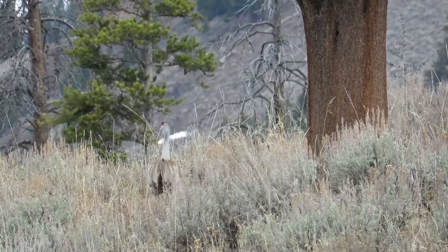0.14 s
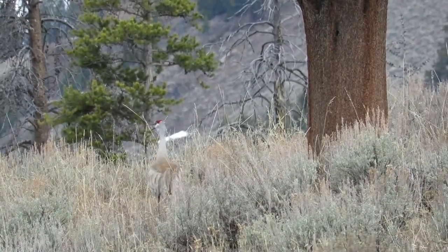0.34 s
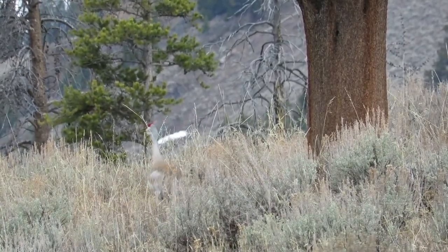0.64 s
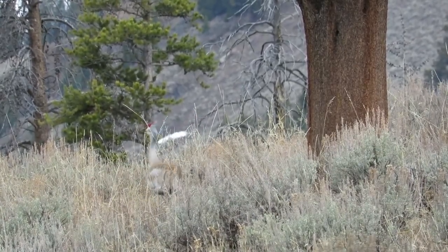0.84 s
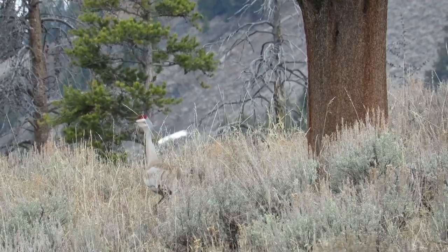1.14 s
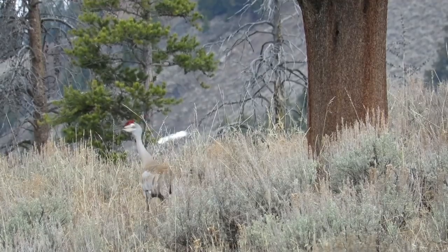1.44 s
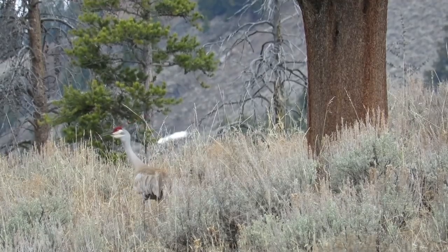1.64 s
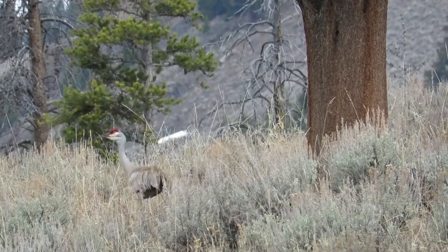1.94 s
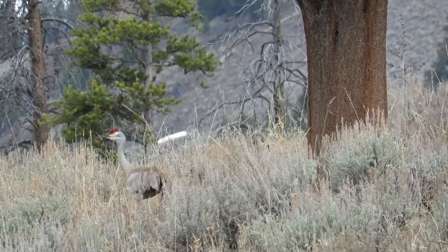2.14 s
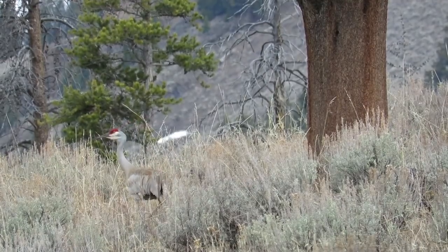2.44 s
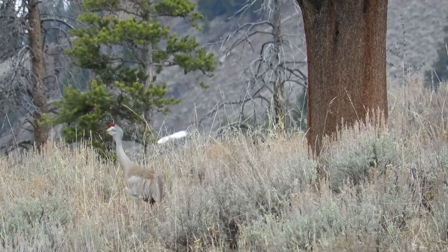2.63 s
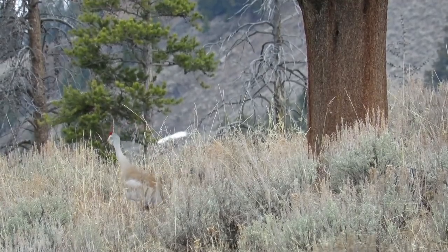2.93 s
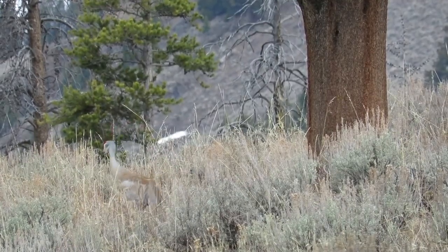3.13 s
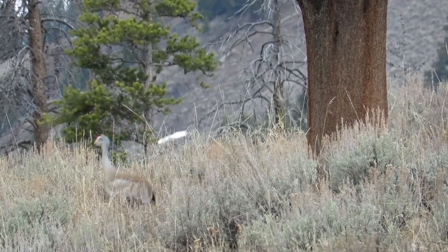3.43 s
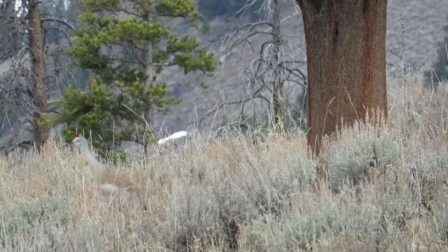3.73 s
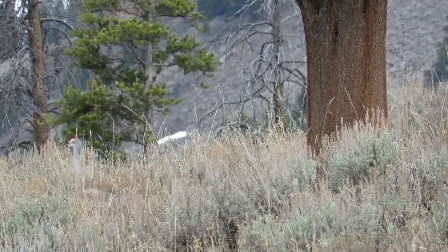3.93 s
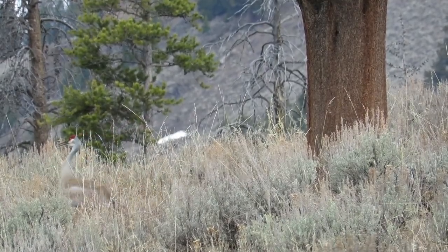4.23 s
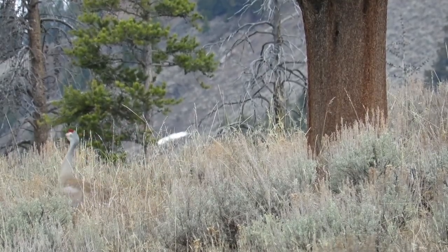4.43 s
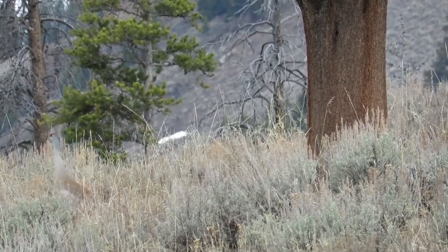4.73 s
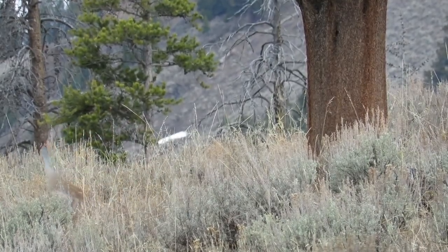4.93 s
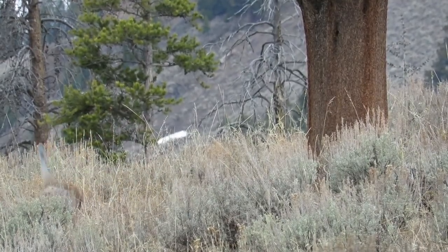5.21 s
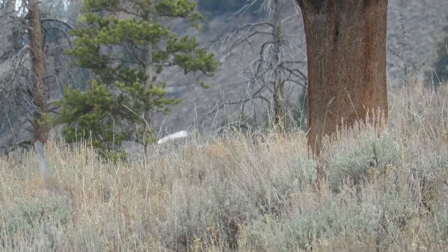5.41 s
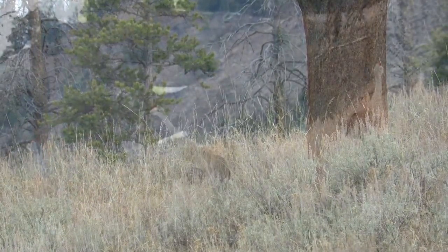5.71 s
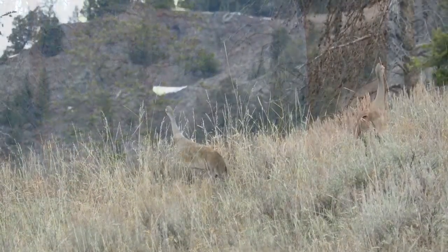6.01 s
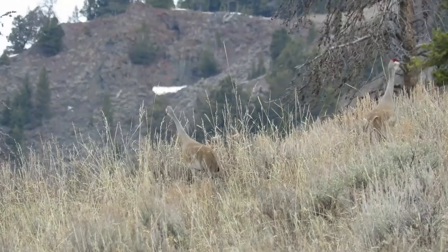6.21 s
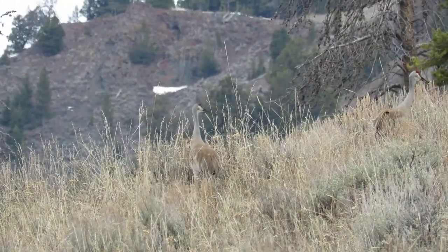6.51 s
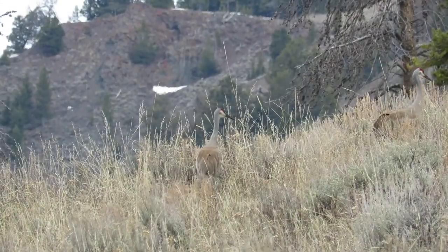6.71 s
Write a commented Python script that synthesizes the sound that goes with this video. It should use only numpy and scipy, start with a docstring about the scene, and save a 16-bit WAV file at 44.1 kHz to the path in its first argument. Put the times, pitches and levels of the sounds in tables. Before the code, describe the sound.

Loud crane duet in open grassland with trees, lasting about 6.9 seconds. It opens in the middle of a low bird's rattling roll; a short honk and a higher answering roll follow at 0.2, then another low roll near 0.6. After a brief gap, honks and overlapping high and low rolls come at 1.2-1.7. Thin gliding songbird whistles show around 0.9-1.1 and 1.7-2.15, with little ticks at 0.8 and 2.6. The pair resumes at 2.9-3.5, again at 3.8-4.4, and at 4.7-5.4, each roll five to nine ringing trumpet bursts that quicken, with rough echoes and a diffuse tonal murmur. Dry grass crackles close by from 4.6 to 5.8, with small knocks and ticks continuing to 6.2. A low call at 5.6 is weaker; fainter, drier rolls follow at 5.9 and 6.6. Soft air and low wind puffs run throughout, quieter at the end.

```python
"""Two cranes call in duet on an open slope: short honks and mostly quickening rolls of trumpet bursts.
A burst is a ringing windpipe, its upper resonances and a breath; a honk is ten harmonics and a rasp.
Sparse decaying echoes scatter both among trees, over a diffuse murmur of brief overlapping harmonic tones.
Filtered noise makes the open air, wind puffs, grass rustle and close ticks, beside decaying sine knocks;
a small songbird whistles in gliding sines."""
import sys
import numpy as np
from scipy import signal
from scipy.fft import rfft, irfft
from scipy.io import wavfile
from scipy.ndimage import uniform_filter1d

SR = 44100
rng = np.random.default_rng(int(sys.argv[2]) if len(sys.argv) > 2 else 0)


def dump_mix(stems):
    """Bounce the given channels to the path in sys.argv[1] as a 16-bit WAV at rate SR."""
    frames = np.atleast_2d(stems).T  # one column per channel
    limited = np.clip(frames, -1, 1)  # hard clip at full scale
    pcm = np.round(limited * 32767).astype(np.int16)
    wavfile.write(sys.argv[1], SR, pcm)


N = 302526

# colour of the breath through the beak: f/Hz, level/dB
BEAK = [(500, -54), (1100, 8), (2000, 2), (3300, -6.5), (4600, -9), (6000, -13.5), (10000, -26),
        (15000, -59)]


def gain_of(db):
    """Level and amplitude: 20 dB is a factor of ten."""
    return 10 ** (np.asarray(db) / 20)


def evened(x):
    """Normalisation: scales a signal to rms 1."""
    return x / np.sqrt(np.mean(x ** 2) + 1e-20)


def read(points, hz):
    """Spectral envelope: interpolates a table on a log-frequency axis."""
    f, value = np.transpose(points)
    return np.interp(np.log(hz + 1), np.log(f + 1), value)


def curve(rows):
    """Level contour: interpolates the second column of a table at every sample."""
    t, value = np.transpose(rows)
    return np.interp(np.arange(N) / SR, t, value)


def add(mix, s, sound):
    """Superposition: adds a sound from time s, cut at both ends of the mix."""
    at = round(s * SR)
    part = mix[max(at, 0):][:max(len(sound) + min(at, 0), 0)]
    part += sound[max(-at, 0):][:len(part)]


def noise(points, patchy_db):
    """Filtered noise: random short-time spectra, shaped in frequency, with drifting patches."""
    hz = np.fft.rfftfreq(1024, 1 / SR)
    real, imaginary, patches = rng.standard_normal((N // 256 + 5, 513, 3)).T
    patches = evened(uniform_filter1d(uniform_filter1d(patches, 10, 0), 10, 1))
    level_db = read(points, hz)[:, None] + patchy_db * patches
    spectra = (real + 1j * imaginary) * gain_of(level_db)
    return signal.istft(spectra, nperseg=1024, noverlap=768)[1][:N]


def waver(size, smooth):
    """Random modulation: twice-smoothed noise of rms 1, smooth in samples."""
    return evened(uniform_filter1d(uniform_filter1d(rng.standard_normal(size), smooth), smooth))


def breath(size, colour):
    """Turbulence: air rushing past the membranes, its spectrum coloured by beak or throat."""
    spectrum = rfft(rng.standard_normal(size))
    return evened(irfft(spectrum * gain_of(read(colour, np.fft.rfftfreq(size, 1 / SR))), size))


def swell(t, rise, fall):
    """Amplitude envelope: a squared-sine opening, then a Gaussian close."""
    return np.sin(np.pi / 2 * np.clip(t / rise, 0, 1)) ** 2 * np.exp(-(np.maximum(t - rise, 0) / fall) ** 2)


def scatter(x, stretch, width):
    """Multiple scattering: sparse echoes of random sign from trunks and slopes, with a t60 set by frequency."""
    # decay among the trees: f/Hz, t60/s (before the stretch)
    decay = [(500, 0.86), (1000, 0.13), (3000, 0.41), (8000, 0.088)]
    size = int(stretch * SR / 2)
    taps = np.zeros((2, size))
    at = np.arange(200, size - 20, 20) + rng.integers(0, 20, (2, (size - 201) // 20))
    np.put_along_axis(taps, at, rng.choice([-1., 1.], at.shape), 1)
    hz, t, spectra = signal.stft(taps, SR, nperseg=256)
    t60 = stretch * read(decay, hz)[:, None]
    tail = signal.istft(spectra * gain_of(-60 * t / t60), SR, nperseg=256)[1]
    tail = tail / np.linalg.norm(tail[0])
    mid, side = signal.fftconvolve(x[None], tail, axes=1)[:, :N]
    return np.array([mid + width * side, mid - width * side])  # width: share opposed between the ports


def air():
    """Stereo decorrelation: broad air noise whose low part is mostly opposed between the ports."""
    # level of the shared part: t/s, level/dB
    levels = [(0, -43), (.65, -44), (5.04, -44.5), (5.29, -41.5), (5.52, -45), (5.83, -51), (6.86, -52)]
    # relative spectrum of what both ports share: f/Hz, density/dB per Hz
    shared = [(25, -46), (45, -48), (80, -5), (300, -3), (600, 3), (1000, 1), (1150, -2), (2400, -11.5),
              (4900, -19.5), (11800, -33), (13800, -38), (15300, -60)]
    # relative spectrum of what they hear opposed: f/Hz, density/dB per Hz
    opposed = [(30, -45), (73, -21), (114, -2.5), (242, 8), (430, 8), (520, 3), (1430, -6.5), (3560, -17),
               (11500, -30), (13800, -38), (15300, -60)]
    mid, side = noise(shared, patchy_db=2.3), noise(opposed, patchy_db=0.5)
    return np.array([mid + side, mid - side]) / np.std(mid) * gain_of(curve(levels))


def wind():
    """Wind turbulence on the microphone: low band noise, each puff rising and falling at a steady dB rate."""
    # puffs: t of the peak/s, peak level/dB, middle f/Hz
    puffs = [(0.609, -55, 110), (1.362, -59, 109), (3.192, -58, 110), (4.03, -52, 60), (4.198, -56, 61.6),
             (5.579, -53, 69), (5.827, -49.5, 44.7), (6.269, -63, 50), (6.589, -57, 50.3)]
    rise_db_per_s, fall_db_per_s = 113, 137
    out, t = np.zeros((2, N)), np.arange(-SR // 2, SR // 2) / SR
    shape = gain_of(np.minimum(rise_db_per_s * t, -fall_db_per_s * t))
    for s, db, hz in puffs:
        band = signal.butter(2, [0.63 * hz, 1.68 * hz], "band", fs=SR, output="sos")
        mid, side = evened(signal.sosfilt(band, rng.standard_normal((2, SR))))
        for port, sign in zip(out, (1, -1)):
            add(port, s + t[0], gain_of(db) * shape * (mid + 0.54 * sign * side))
    return out


def murmur():
    """Diffuse superposition: brief overlapping harmonic tones at random times in two pitch groups, smeared."""
    # level of the whole murmur: t/s, level/dB
    levels = [(0, -32), (.15, -38), (1.16, -37), (1.45, -29), (1.75, -40.5), (1.97, -39), (2.44, -35.5),
              (2.95, -43), (3.3, -35), (3.7, -40.5), (4.0, -33.5), (4.6, -37.5), (5.15, -34), (5.35, -35.5),
              (6.25, -53.5), (6.86, -47)]
    # relative level of each partial from the first up: level/dB
    partials = [8, -10, -35, -24.5, -32]
    centre_hz, tones_per_s = 819.7, 70  # midway between the two pitch groups
    tones, t = np.zeros(N), np.arange(900) / SR
    for when, spread, size, long, group in rng.random((600, 5))[:int(tones_per_s * N / SR)]:
        hz = centre_hz * (1 + 0.074 * np.sign(group - .5) + 0.029 * (long - .5))
        tone = 0
        for k, db in enumerate(partials, 1):
            detuned = k * hz * (1 + 0.2 * (spread - .5) / k ** 3)
            tone = tone + gain_of(db) * np.sin(2 * np.pi * detuned * t)
        hump = np.sin(np.pi * np.clip(t / (.011 + 0.0066 * long), 0, 1)) ** 2
        add(tones, when * N / SR, gain_of(5.3 * size) * tone * hump)
    diffuse = 0.69 * tones + scatter(tones, 2.7, width=0.33)
    running_rms = np.sqrt(uniform_filter1d(diffuse.mean(0) ** 2, 9000))
    return diffuse / running_rms * gain_of(curve(levels))


def grass():
    """Friction noise: dry stalks rub and crackle for about a second and a half, independently at each port."""
    # rustle, before the fades at either end: t/s, level/dB
    levels = [(4.4, -56), (4.72, -50.5), (4.78, -48.5), (4.9, -44), (5.0, -47.5), (5.15, -55), (5.3, -50.5),
              (5.45, -47), (5.6, -45.5), (5.87, -54)]
    # relative spectrum: f/Hz, density/dB per Hz
    colour = [(120, -21), (270, 13), (500, -10), (1500, 2.5), (5000, -11), (8000, -10), (12000, -14),
              (13200, -15), (15000, -53)]
    t = np.arange(N) / SR
    fade_in = np.clip((t - levels[0][0]) / 0.26, 0, 1)
    fade_out = np.clip((levels[-1][0] - t) / 0.63, 0, 1)
    crackle = gain_of(0.63 * waver(N, 60))
    rub = np.array([evened(noise(colour, patchy_db=-2.0)) for _ in range(2)])
    return rub * crackle * fade_in * fade_out * gain_of(curve(levels))


def ticks():
    """Impulsive sources near the microphone: decaying noise for treble ticks, decaying sines for dull knocks."""
    # ticks: t/s, peak level/dB, lowest f/Hz
    snaps = [(.758, -34, 3430), (2.62, -36, 4500), (2.662, -33, 3500), (4.648, -37, 4000),
             (4.723, -37, 3500), (5.607, -49, 7100), (5.713, -46, 4440), (5.794, -45, 4020),
             (5.888, -38, 2200), (6.122, -38.5, 1600)]
    # knocks: t/s, amplitude before attack and decay/dB, f/Hz
    knocks = [(4.888, -31, 420), (5.171, -16, 1230), (5.428, -23, 530), (5.594, -32, 330),
              (5.688, -31, 328), (6.123, -35, 297), (6.179, -35, 330)]
    out, t = np.zeros(N), np.arange(1200) / SR
    for s, db, hz in snaps:
        snap = rng.standard_normal(len(t)) * (np.exp(-t / 0.0006) + 0.12 * np.exp(-t / 0.013))
        snap = signal.sosfilt(signal.butter(2, [hz, 13500], "band", fs=SR, output="sos"), snap)
        add(out, s, gain_of(db) * snap / abs(snap).max())
    for s, db, hz in knocks:
        envelope = np.minimum(t / 0.00042, 1) * np.exp(-t / 0.0016)
        add(out, s, gain_of(db) * np.sin(2 * np.pi * hz * t) * envelope)
    return out


def songbird():
    """Frequency glides: short whistled sines with a fluttering level, scattered among the trees."""
    # notes: t/s, length/s, first f/Hz, last f/Hz, level before flutter and fades/dB
    notes = [(0.872, 0.048, 2465, 2520, -59), (0.995, 0.025, 3810, 3850, -55.5),
             (1.005, 0.014, 3150, 3100, -59), (1.063, 0.031, 2220, 2600, -55),
             (1.113, .014, 3140, 3100, -62), (1.703, 0.028, 2830, 2690, -55),
             (1.726, 0.02, 2640, 3480, -53), (1.736, 0.036, 3530, 2960, -50.5),
             (1.822, .016, 3600, 3800, -62), (1.85, .015, 4750, 4950, -57), (1.868, .03, 3550, 2880, -55.5),
             (1.905, .02, 4050, 4120, -61), (1.948, .012, 4700, 4900, -60), (2.005, 0.03, 3440, 3530, -58),
             (2.053, .035, 3900, 3650, -61), (2.09, 0.034, 3530, 2720, -52.5),
             (2.131, .03, 4700, 4900, -61)]
    out = np.zeros(N)
    for s, length, hz, last_hz, db in notes:
        size = round(length * SR)
        tone = np.sin(2 * np.pi * np.cumsum(np.linspace(hz, last_hz, size)) / SR)
        flutter = 1.1 + 0.28 * waver(size, 40)
        add(out, s, np.sqrt(2) * gain_of(db) * tone * signal.windows.tukey(size, .5) * flutter)
    return out + gain_of(-8.0) * scatter(out, 0.068, width=1.0)


def honk(s, length, hz, last_hz, tone_db, tilt_db, throat_hz, bright_db, rasp_db):
    """Source and filter: a hoarse note of ten wavering harmonics, lifted near the throat resonance."""
    # relative level of the lowest four partials: f/Hz, level/dB
    low_colour = [(510, 1), (590, -2), (680, -0.5), (1030, -2), (1160, 3), (1350, 2), (1700, -2),
                  (2000, -4.5), (2700, -13)]
    # relative level of partials five to ten: f/Hz, level/dB
    bright_colour = [(2500, 3), (2850, 7), (3300, 2), (4400, -0.5), (6000, -16), (8000, -28)]
    # throat's colour of the rasp: f/Hz, level/dB
    throat = [(400, -29), (650, 4), (1000, -4), (1500, -8), (2800, -15), (4500, -25), (8000, -51)]
    throat_lift_db, throat_width_hz = 5, 380
    arch_share = 0.045  # share by which the pitch arches up to the middle
    size = 2 * int(length * SR)
    t = np.arange(size) / SR / length  # in lengths of the honk
    arch = arch_share * (np.sin(np.pi * np.minimum(t / 1.147, 1)) - .75)
    glide = np.interp(t, [.1, 1.1], [hz, last_hz])
    cycles = np.cumsum(glide * (1 + arch + .012 * waver(size, 200))) / SR
    low, high = 0, 0
    for k in range(1, 11):
        line = (1 + (.38 + .04 * k) * waver(size, 70)) * np.sin(2 * np.pi * (k * cycles + rng.random()))
        if k <= 4:
            lift_db = throat_lift_db * np.exp(-((k * hz - throat_hz) / throat_width_hz) ** 2)
            low = low + gain_of(tone_db + tilt_db * (k - 1) + read(low_colour, k * hz) + lift_db) * line
        else:
            high = high + gain_of(read(bright_colour, k * hz)) * line
    high = evened(high) + .4 * breath(size, BEAK)
    rasp = breath(size, throat) * (1 + 0.18 * np.cos(2 * np.pi * cycles))  # puffs once a cycle
    body = (low + gain_of(rasp_db) * rasp) * swell(t, 0.4, 0.85)
    bright = gain_of(bright_db) * high * swell(t, 0.49, 0.77)  # opens later, then falls faster
    end_fade = np.clip((1.25 - t) / 0.46, 0, 1)  # a short fade to silence
    return s - .1 * length, end_fade * (body + bright)


LOW_VOICE_BELOW_HZ = 830  # parts the two birds by voice pitch
RING_RISE, RING_FALL = .42, .6  # shares of a burst's length


def burst(s, hz, ring_hz, ring_db, second_db, bright_db, tilt_db, ms):
    """Resonance: membranes slam open, the windpipe rings low; upper resonances and breath last longer."""
    # upper resonances of the low bird's coiled windpipe: f/Hz, width/Hz, relative level/dB
    low_pipe = [(1730, 150, -6), (2385, 110, 0), (2820, 120, -5), (3140, 200, -2), (3945, 220, -2),
                (4420, 150, -12), (4780, 220, -8), (5500, 250, -15), (6300, 300, -23)]
    # upper resonances of the high bird's: f/Hz, width/Hz, relative level/dB
    high_pipe = [(2030, 120, -7), (2745, 90, 0), (3320, 130, -6), (3570, 170, -1), (4570, 220, -4),
                 (5440, 180, -12), (6500, 300, -24)]
    ring_glide_per_s, voice_glide_per_s = 5, 1.1  # shares of the pitch lost per second within a burst
    t, length = np.arange(2000) / SR, ms / 1000
    ring_cycles = ring_hz * t * (1 + ring_glide_per_s * (.5 * length - t / 2))
    ring = gain_of(ring_db) * np.sin(2 * np.pi * (ring_cycles + rng.random()))
    ring = ring * swell(t, RING_RISE * length, RING_FALL * length)
    glide = voice_glide_per_s * np.maximum(.5 * length - t, -length)
    cycles = np.cumsum(hz * (1 + 0.011 * waver(len(t), 120) + glide)) / SR
    second = np.sin(2 * np.pi * (2 * cycles + rng.random())) * (1 + .55 * waver(len(t), 60))
    second = gain_of(second_db) * second * swell(t, .4 * length, .85 * length)
    # each line's level and frequency vary at random from burst to burst; random modulation roughens it
    pipe = 0
    for f, width, db in (low_pipe if hz < LOW_VOICE_BELOW_HZ else high_pipe):
        gain = gain_of(db + tilt_db * f / 1000 + 2.2 * rng.standard_normal())
        roughness = .5 + .6 * waver(len(t), int(.25 * SR / width))
        varied_hz = f + .25 * width * rng.standard_normal()
        pipe = pipe + gain * roughness * np.sin(2 * np.pi * (varied_hz * t + rng.random()))
    pipe = evened(pipe) * swell(t, 0.002 + 0.25 * length, 0.006 + 0.45 * length)
    rush = .62 * breath(len(t), BEAK) * swell(t, .003 + .3 * length, .008 + .7 * length)
    return s - RING_RISE * length, ring + second + gain_of(bright_db) * (pipe + rush)


LOW_MS, HIGH_MS = 14, 9.5  # length of a direct burst for each bird
ECHO_SPREAD_MS, ECHO_STRETCH = 2.5, 1.45  # scatter of the delay; rough bark draws the echo out
RING_SPREAD, RING_SAG, PITCH_SPREAD = 0.018, 0.025, .01  # shares of pitch: chance, sag along a roll, chance
UNEVEN_DB, TOP_FADE = .8, 2.2  # chance from beat to beat; fade of the upper partials, times the ring's
FIRST_TOP_DB = 0.5  # the first direct burst has stronger upper partials


def roll(start, beats, first_ms, settled_ms, settle, hz, ring_hz, ring_db, second_db, bright_db, tilt_db,
         fade_db, echo_ms, echo_db, echo_top_db):
    """Geometric settling and reflection: gaps approach a limit, each beat thrown back once by a near trunk."""
    k = np.arange(round(beats))
    gaps_ms = settled_ms + (first_ms - settled_ms) * settle ** k[:-1]
    times = start + np.cumsum(np.r_[0, gaps_ms]) / 1000
    ms = LOW_MS if hz < LOW_VOICE_BELOW_HZ else HIGH_MS
    for s, done in zip(times, k / k[-1]):
        fade = fade_db * done ** 7.6  # falls mainly at the end of the roll
        direct = (0, 0, 0)
        echo = (echo_ms + ECHO_SPREAD_MS * rng.standard_normal(), echo_db, echo_top_db)
        for late_ms, low_db, top_db in (direct, echo):
            a, b, c, d, e = rng.standard_normal(5)
            top_db += TOP_FADE * fade + (FIRST_TOP_DB if s == start and not late_ms else 0)
            yield (s + late_ms / 1000,
                   hz * (1 + PITCH_SPREAD * a),
                   ring_hz * (1 - RING_SAG * done + RING_SPREAD * b),
                   ring_db + low_db + fade + UNEVEN_DB * c,
                   second_db + top_db + UNEVEN_DB * d,
                   bright_db + top_db + UNEVEN_DB * e,
                   tilt_db,
                   ms * ECHO_STRETCH if late_ms else ms)


def cranes():
    """Direct sound plus reverberation: the near pair, straight ahead, with the trees ringing after them."""
    # honks: t/s, length/s, first and last f before the arch/Hz, tone level/dB, tilt/dB per partial,
    # throat resonance f/Hz, bright partials level/dB, rasp level/dB
    honks = [(0.083, 0.064, 589, 619, -42.5, -1, 2400, -55, -40),
             (0.487, .07, 507, 518, -42.5, 1, 2050, -45, -35.5),
             (1.15, .09, 661, 682, -41, -4.5, 2000, -55, -40),
             (1.352, .07, 663, 625, -37.5, -4, 1300, -58, -39),
             (2.895, 0.059, 578, 553, -44, -2.5, 1160, -46, -39),
             (3.05, 0.063, 571, 583, -45.5, 1.5, 1160, -62, -41),
             (3.777, 0.071, 667, 640, -32.5, -8, 2000, -64, -38.5),
             (4.014, 0.074, 571, 579, -42.5, 2.5, 1160, -47, -41),
             (4.724, .07, 570, 510.5, -40, -0.5, 1480, -45, -36),
             (4.975, .07, 581.4, 574, -39.5, 1.2, 1170, -51, -44),
             (5.49, .07, 672, 667, -37, -1.5, 1350, -52, -35),
             (5.826, .075, 590, 592, -50, 4, 1700, -55, -42),
             (6.456, 0.059, 639, 632, -45, -13.5, 1310, -75, -49.5)]
    # rolls: first beat t/s, beats, first gap/ms, settled gap/ms, share of the extra gap left at each next beat,
    # voice f/Hz, windpipe ring f/Hz, ring level/dB, second partial level/dB, bright partials level/dB,
    # their tilt/dB per kHz, fade of the ring by the last beat/dB, echo delay/ms,
    # echo level of the ring/dB, echo level of the upper partials/dB
    rolls = [(-.219, 8, 62.4, 42, 0.51, 745, 773, -22, -34.5, -36.5, -1.3, -11, 22, -6, -5),
             (.185, 7, 56.5, 40, 0.6, 913, 887, -19.5, -41.5, -49.5, -0.5, -9.5, 33, -8.5, 1.5),
             (.572, 6, 55.3, 33, 0.67, 771, 752, -20.5, -36.5, -43, -0.5, -14, 26, -6, 1.5),
             (1.273, 7, 52.4, 47.5, 0.5, 889, 874, -25.5, -38.5, -45.5, -1, -4, 28.4, -6, 0.8),
             (1.439, 6, 59.3, 30, 0.61, 782.5, 800, -22.5, -35.5, -39.5, -0.5, -4.5, 24.7, -9, -1.5),
             (2.996, 7, 59.2, 36.6, 0.72, 773, 754.4, -23.5, -36, -41, 0, -2, 29, -8, 1.5),
             (3.154, 9, 57.7, 40, 0.65, 888, 880, -21.5, -33.5, -42.5, 1, -4, 27.8, -14, 0.5),
             (3.878, 5, 56, 34.2, 0.71, 786, 740.6, -21.5, -34.5, -40, -1.2, -1, 21.3, -16, -1),
             (4.114, 7, 62.4, 38.7, 0.44, 881, 864, -18.5, -36.5, -45.5, -1, -13, 26.4, -15, 5),
             (4.826, 6, 57.3, 48.3, 0.3, 776, 767, -20, -34.5, -40.5, 0.3, -4, 20.1, -11, 3.5),
             (5.086, 8, 61.5, 40.5, .42, 914, 899, -22.5, -36.5, -43.5, 0.5, -10.5, 24, -7, -1),
             (5.59, 5, 58.5, 36, 0.6, 769, 765, -26.5, -32.5, -39.5, -2, -4, 20.2, -8.5, -3.5),
             (5.933, 8, 56.8, 41.7, 0.66, 886, 913, -29.5, -41.5, -51, 2, -3.5, 23.5, -29, -14),
             (5.937, 3, 46, 46, 0.63, 767, 736, -33.5, -44, -52, 1.5, 0, 21, -20, -10),
             (6.559, 5, 57.5, 46, 0.197, 768, 740, -31, -44, -55, -3.5, -8, 28, -21, -15)]
    pair = np.zeros(N)
    for row in rolls:
        for beat in roll(*row):
            add(pair, *burst(*beat))
    for row in honks:
        add(pair, *honk(*row))
    # the reverberation grows weaker through the later calls, so the last ones sound drier
    ringing = gain_of(curve([(4.67, -7.5), (9.5, -23)]))  # t/s, level/dB
    return pair + scatter(pair * ringing, 1.0, width=0.027)


def scene():
    """Linear superposition of all sources at the two ports."""
    return air() + wind() + murmur() + grass() + ticks() + songbird() + cranes()


def record(dry):
    """Band limiting: a slightly louder left port, the recorder's thin hiss, a bass cut and a treble edge."""
    # relative spectrum of the recorder's own hiss: f/Hz, density/dB per Hz
    colour = [(3000, -19), (8000, -16), (12500, -3), (14000, -3), (15300, -25.5)]
    hiss_db, bass_cut_hz, edge_hz = -87, 36, 15500  # hiss level is that of the opposed part
    mid, side = evened(noise(colour, patchy_db=7)), evened(noise(colour, patchy_db=0))
    hiss = gain_of(hiss_db) * (.5 * mid + [[1], [-1]] * side)
    ports = dry * gain_of([[.2], [-.2]]) + hiss
    wet = signal.sosfilt(signal.butter(2, bass_cut_hz, "high", fs=SR, output="sos"), ports)
    lowpass = signal.firwin(1023, edge_hz, window=("kaiser", 9), fs=SR)
    return signal.oaconvolve(wet, lowpass[None], "same")


dry = scene()
out = record(dry)
dump_mix(out)
```